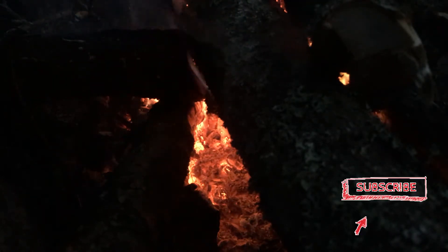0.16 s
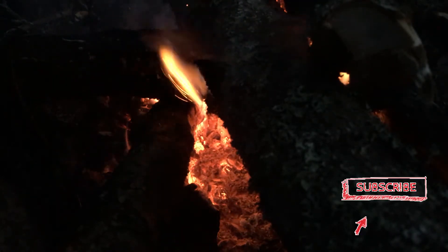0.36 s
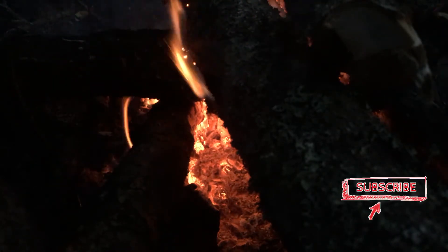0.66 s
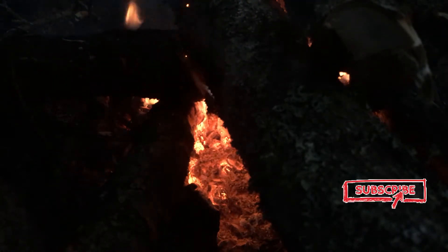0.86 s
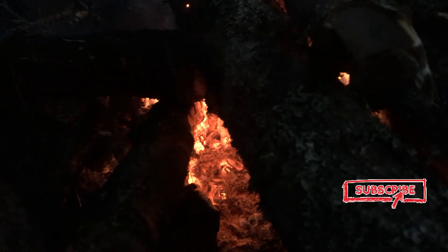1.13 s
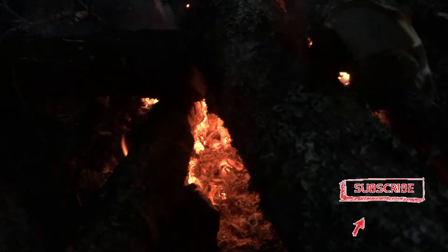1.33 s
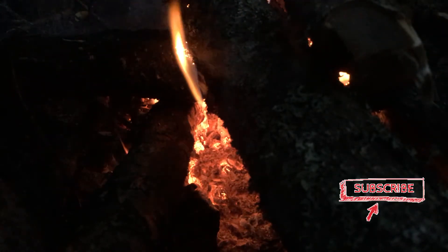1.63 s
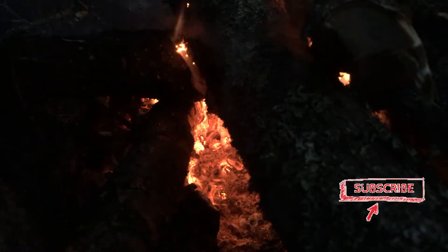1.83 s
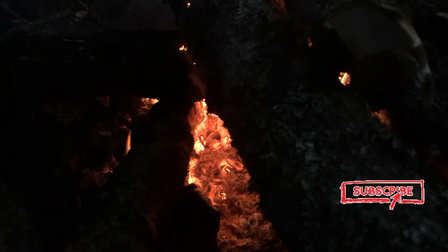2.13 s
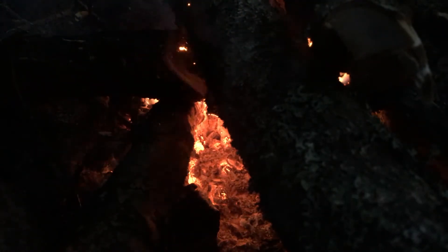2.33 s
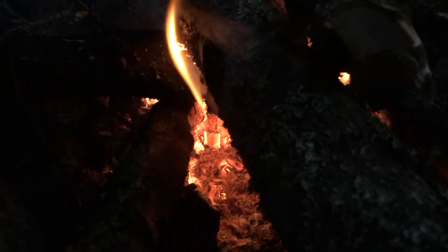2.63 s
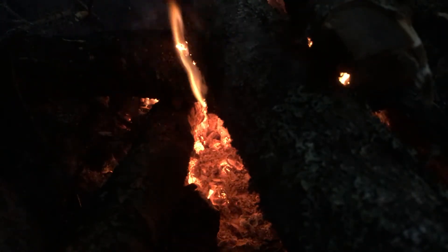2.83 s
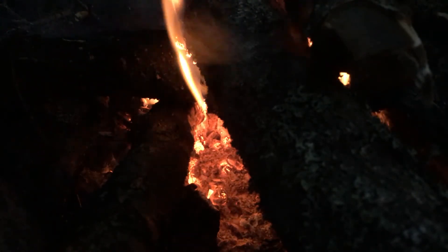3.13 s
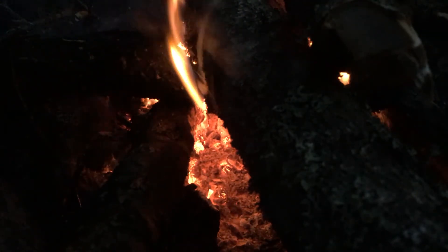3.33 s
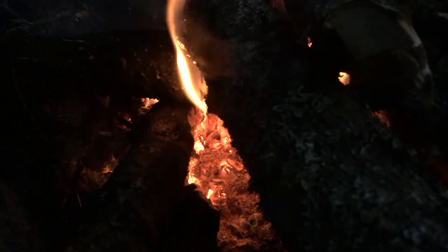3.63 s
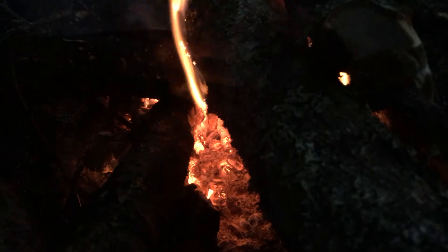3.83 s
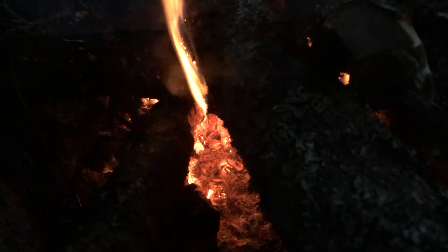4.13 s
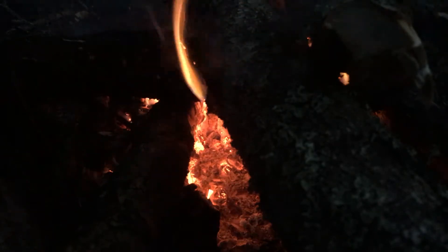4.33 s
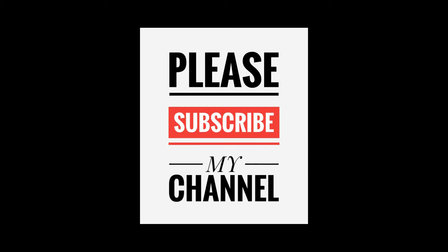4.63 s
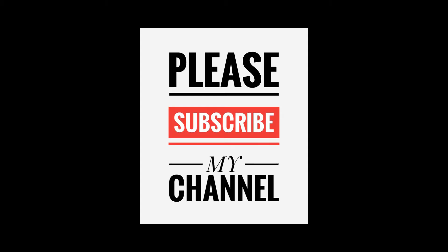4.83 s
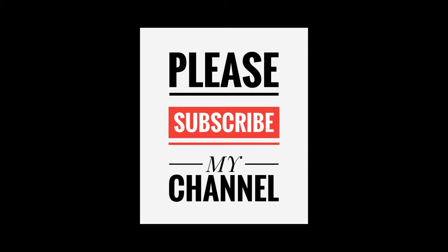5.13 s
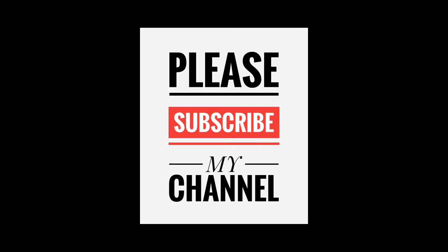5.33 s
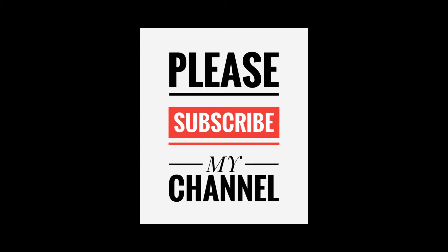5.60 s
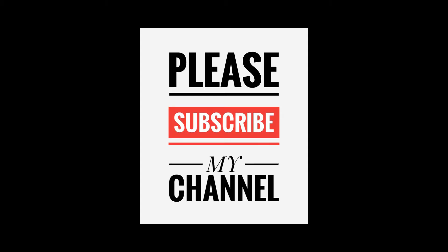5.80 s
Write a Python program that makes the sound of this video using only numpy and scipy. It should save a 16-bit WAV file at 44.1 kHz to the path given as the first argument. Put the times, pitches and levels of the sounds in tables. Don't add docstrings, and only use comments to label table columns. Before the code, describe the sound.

A summer night outdoors by a campfire, heard closely in stereo for about six seconds. A near katydid drones continuously, a bright, hissy buzz centred around 11 to 12 kHz, pulsing over 230 times a second, dipping most clearly near 2.3 s. Crickets around 7 kHz chirp roughly four times a second, mainly on the right, over soft distant trills near 4 kHz. Quiet, coarse four-scrape rasps come at 0.6, 2.0, 3.4 and 4.7 s, with a barely audible one at 1.45. Low flame roar flickers throughout, with soft flaps, strongest around 0.9 to 1 s. Dry ember snaps cluster in the first 0.6 s; duller pops follow at 2.3. At 3.36 to 3.5 s a log settles with hollow knocks, pops and crumbling grains. A faint crumble follows at 4.2, then scattered pops and a low knock from 5.3 to 5.8. Tiny ticks continue throughout.

```python
import sys
import numpy as np
from scipy import signal
from scipy.fft import rfft, irfft
from scipy.io import wavfile
from scipy.ndimage import uniform_filter1d, map_coordinates

SR = 44100
rng = np.random.default_rng(int(sys.argv[2]) if len(sys.argv) > 2 else 0)


def output_pcm(signal):
    pcm = np.clip(np.atleast_2d(signal).T, -1, 1) * 32767
    wavfile.write(sys.argv[1], SR, np.round(pcm).astype(np.int16))


def decibels_to_gain(level_db):
    exponent = np.asarray(level_db, float) / 20
    return 10 ** exponent


N = 262836
EARS = np.array([[.5], [-.5]])

# freq_hz, density_db (per Hz)
WING_COLOUR = [(4880, -62), (8300, -27), (10400, -4.5), (11500, -0.5), (12800, -2), (13300, -7.5),
               (14100, -20), (15600, -26)]
STROKES_PER_S, DRONE_DB, FALL_S = 232.3, -33, 0.047
# low_point_s, depth_db, recovery_s
DRONE_FALTERS = [(0.27, -2, 0.056), (0.44, -1, 0.17), (1.19, -2, .1), (1.44, -2, 0.093), (2.31, -5, 0.08),
                 (3.21, -2, 0.23), (3.42, -2, 0.08), (4.11, -2, 0.22), (4.45, -2.5, 0.25), (5.05, -2, 0.11),
                 (5.46, -2, 1), (5.63, -1.5, .4)]

# pitch_hz, chirps_per_s, first_chirp_middle_s
CRICKET_BEATS = [(7255, 3.518, .23), (7250, 4.132, .007), (7095, 4.126, -.02), (6930, 4.126, -.02),
                 (6820, 3.854, .188), (7370, 3.795, .01), (7260, 3.916, .239)]
# level_db, left_right_db
CRICKET_PLACES = [(-50.5, -9), (-51.5, -8.5), (-54, -10), (-57, -9), (-58, -12), (-60.5, -4), (-57, -14)]
REST_DB, PULSES_PER_S = -13, 43
STEADY_HZ, STEADY_DB, TRILL_DB = 7085, -52.5, -55

# freq_hz, density_db (per Hz)
ROAR_COLOUR = [(15, -4), (30, -5.5), (55, 0.5), (100, -6.5), (200, -11.5), (400, -21.5), (900, -30.5),
               (1600, -38.5), (3000, -35.5), (16000, -99)]
# start_s (middle of the swell), rise_db over the steady roar
FLAME_SURGES = [(0.33, 2.5), (0.9, 4), (1.1, 2), (1.54, 4), (2.22, 0.5), (2.53, 3), (2.8, 2), (3.23, 4),
                (3.9, 3.5), (4.3, 1.5), (5.37, 2.5), (5.55, 2.5)]
ROAR_DB, SURGE_S, ROAR_SAME = -44.5, 0.038, 0.67
# time_s, level_db
HISS_LEVEL = [(0.0, -62.5), (2.2, -62), (3.3, -64), (3.52, -61), (3.9, -62), (4.33, -62.5), (4.47, -65.5),
              (5.96, -65.5)]
# freq_hz, density_db (per Hz)
HISS_TONE = [(300, -2.5), (1000, 1.5), (1600, -1), (2100, 0.5), (3000, 2), (4800, -1), (6200, 1),
             (7700, -4), (8400, -39), (16000, 0)]

# start_s, peak_db, ring_hz, sizzle_db, left_right_db
EMBER_SNAPS = [(0.0288, -30.5, 3720, -8, 2), (0.2445, -36, 5880, 1, 3), (0.254, -29, 5550, -19, 10),
               (0.3487, -42, 4040, -20, 10), (0.3974, -28.5, 5900, -35, 4.5), (0.5082, -38, 4040, -4, 6),
               (0.5545, -40, 3930, 0, 0.0), (0.7462, -38, 6460, -13, -1.5), (1.4637, -38, 3850, -23, 6),
               (3.7227, -48, 3870, 4, 0.0), (3.8234, -39, 3980, -10, -0.5), (5.2647, -40, 3860, -8, 2),
               (5.6136, -39, 3910, -19, 8.5), (5.7703, -34, 3940, -20, 15)]
# start_s, peak_db, ring_hz, sizzle_db, left_right_db
DULL_POPS = [(0.0286, -26, 3430, -10, -1), (0.922, -37, 2340, -1, -5), (2.2871, -32, 1700, -28, 0.0),
             (2.387, -37.5, 1550, -20, 0.0), (3.3879, -33, 1860, -20, 1), (3.4576, -28.5, 1950, -25, -0.5),
             (3.4615, -34, 2480, -25, -0.5), (3.4941, -30, 2400, -20, -0.5), (3.904, -36, 1360, -13, -8),
             (5.3722, -35, 2100, -14, -10), (5.5087, -36, 2440, -22, 6), (5.7701, -30.5, 1520, -10, 7),
             (5.7746, -30, 3340, -16, -7.5)]
# start_s, peak_db, ring_hz
FAINT_POPS = [(1.654, -41, 3600), (2.293, -40.5, 1400), (2.5257, -49, 2590), (2.597, -40, 1700),
              (2.9543, -44, 2100), (3.0186, -44, 2430), (3.359, -40.5, 2330), (3.373, -44, 3490),
              (3.5118, -45, 3390), (4.2244, -51, 1860), (4.3094, -53, 3280), (4.4284, -42, 1750)]
FAINT_SIZZLE_DB, SNAP_THUMP_DB, POP_THUMP_DB = -10, -54, -49
# start_s,
# level_db, pitch_hz, t60_s
KNOCKS = [(0.2445, -27.5, 294, 0.014), (0.922, -42, 300, 0.027), (3.362, -45, 800, 0.037),
          (3.388, -30, 832, 0.037), (3.387, -44, 1260, 0.018), (3.456, -41, 1150, 0.023),
          (3.457, -35, 556, 0.041), (3.462, -39.5, 403, 0.037), (3.458, -36.5, 860, 0.054),
          (3.476, -36, 850, 0.037), (3.496, -38, 990, 0.022), (3.503, -43, 706, 0.028),
          (3.904, -45, 320, 0.019), (4.224, -37.5, 850, 0.02), (5.372, -33.5, 292, .025)]
# start_s, length_s, level_db, pitch_hz
CHAR_CRUMBLES = [
    (0.019, 0.031, -57, 1490),
    (2.499, 0.15, -64, 1500),
    (3.001, 0.13, -61.5, 750),
    (3.355, 0.065, -57, 1500),
    (3.453, 0.073, -57, 1510),
    (4.199, .27, -64.5, 1300),
]
# start_s, peak_db, pitch_hz
FLAME_FLAPS = [(0.123, -30.5, 182), (0.317, -30.5, 98), (0.888, -23.5, 142), (0.984, -25, 96.9),
               (1.116, -30, 141), (1.397, -37, 153), (2.263, -30.5, 129), (2.524, -32, 147),
               (3.227, -27, 114), (3.763, -33, 258), (4.051, -35.5, 98), (4.83, -35, 92), (5.374, -29, 154),
               (5.681, -49, 106)]

# start_s, level_db, scrape_gap_s
RASP_PHRASES = [
    (0.619, -52.5, 0.069),
    (1.45, -69, 0.0565),
    (2.01, -53, 0.068),
    (3.37, -53, 0.0706),
    (4.717, -53.5, 0.073),
]
# freq_hz, width_hz, level_db
RASPER_BODY = [(2100, 380, -3.5), (3360, 630, 0.5), (4570, 680, 2), (5050, 570, -5)]
TEETH_PER_S, FAR_RASP_DB = 140, -73.5
# start_s, length_s, level_db, pitch_hz
SMALL_BUZZES = [
    (0.915, 0.11, -57.5, 6070),
    (3.705, 0.13, -67, 6030),
    (4.93, 0.118, -61, 5970),
]

# freq_hz, margin_db
THINNED_BANDS = [(2000, -10), (3000, -7), (3600, -7), (3700, -20), (4250, -20), (4350, -4), (6200, -4),
                 (6500, -20), (7550, -20), (7650, -.5), (8300, -.5), (8900, -10), (14500, -6), (15300, .2)]


def evened(x):
    return x / np.sqrt(np.mean(x ** 2) + 1e-20)


def curve(rows):
    s, *columns = np.transpose(rows)
    return [np.interp(np.arange(N) / SR, s, c) for c in columns]


def read(points, hz):
    f, value = np.transpose(points)
    return np.interp(np.log(hz + 1), np.log(f + 1), value)


def add(mix, s, sound):
    part = mix[..., round(s * SR):][..., :sound.shape[-1]]
    part += sound[..., :part.shape[-1]]


def resonate(x, hz, width):
    r = np.exp(-np.pi * width / SR)
    pole = r * np.exp(2j * np.pi * hz / SR)
    return 2 * signal.lfilter([1 - r], [1, -pole], x + 0j).real


def drift(rate):
    knots = rng.standard_normal(2000)
    return evened(map_coordinates(knots, [np.arange(N) / SR * rate + 5], order=3))


def placed(x, pan_db, wet_db, t60):
    t = np.arange(SR // 2) / SR
    tail = rng.standard_normal((2, len(t))) * decibels_to_gain(-60 * t / t60) * np.minimum(t / 0.0038, 1)
    wet = signal.fftconvolve(x[None], tail / np.linalg.norm(tail[0]), axes=1)[:, :N]
    return (x + decibels_to_gain(wet_db) * wet) * decibels_to_gain(EARS * pan_db)


def effort():
    s, depth_db, back_s = np.transpose(DRONE_FALTERS)[:, :, None]
    since = np.arange(N) / SR - s
    falling = np.exp(-(since / FALL_S) ** 2)
    recovering = np.exp(-abs(since) / back_s)
    return DRONE_DB + (depth_db * np.where(since < 0, falling, recovering)).sum(axis=0)


def drone():
    rate = STROKES_PER_S * (1 + .007 * drift(4))
    cycle = np.cumsum(rate / 2 * (1 + .015 * drift(100))) / SR
    hz = np.fft.rfftfreq(N, 1 / SR)
    low = (14000 - hz) / 5000
    strokes = [(.25, 0, -1.2, .0017), (.75, -6.5, 1.2, .0015)]
    wings = 0
    for at, db, tilt_db, fall_s in strokes:
        click = np.diff(np.floor(cycle - at + .012 * drift(300)), prepend=-1) * decibels_to_gain(1.6 * drift(120))
        scrape = np.exp(-.5 * ((cycle % 1 - at) / 0.13) ** 2) * rng.standard_normal(N)
        stroke = evened(click) + 0.66 * evened(scrape)
        tilt = decibels_to_gain(db + tilt_db * (hz - 11500) / 1000)
        falling_pitch = np.exp(-1j * np.pi * 5000 * fall_s * -low ** 2)
        wings = wings + rfft(stroke) * tilt * falling_pitch
    colour = decibels_to_gain(read(WING_COLOUR, hz))
    flat = wings / np.sqrt(uniform_filter1d(abs(wings) ** 2, size=3000))
    near = evened(irfft(flat * colour, N))
    blur = rng.standard_normal((3, N))
    others = evened(irfft(rfft(blur[:2] + 0.93 * blur[2]) * colour, N))
    both = placed(near, -.1, -0.53, 0.28) + others
    lean_db = EARS * 1.24 * (11500 - hz) / 1000
    return evened(irfft(rfft(both) * decibels_to_gain(lean_db), N)) * decibels_to_gain(effort())


def singer(hz, rate, duty, glide):
    cycle = np.cumsum(rate * (1 + .04 * drift(6))) / SR + rng.random()
    part = np.minimum(cycle % 1 / duty, 1)
    pitch = hz * (1 + glide * (.5 - part) + .003 * drift(30))
    pulse = np.sin(np.pi * part) ** 0.78 * decibels_to_gain(1.2 * drift(40))
    return evened(pulse * np.sin(2 * np.pi * np.cumsum(pitch) / SR))


def crickets():
    t, near = np.arange(N) / SR, 0
    for k, ((hz, beat, first_s), (db, pan_db)) in enumerate(zip(CRICKET_BEATS, CRICKET_PLACES)):
        swell_db = REST_DB * np.sin(np.pi * beat * (t - first_s)) ** 2
        song = singer(hz, PULSES_PER_S + 3 * k, .7, .02) * decibels_to_gain(db + swell_db)
        near = near + placed(song, pan_db, -1.2, 0.27)
    steady = placed(singer(STEADY_HZ, 66, 0.9, .03), -7.5, -2.2, 0.096) * decibels_to_gain(STEADY_DB)
    pitch, rate = rng.random((12, 2)).T
    spread = (np.arange(len(pitch)) + pitch) / len(pitch)
    far = 0
    for p, r in zip(spread, rate):
        far = far + singer(7390 - 900 * p, 35 + 35 * r, 0.66, .04) * decibels_to_gain(-14 * p ** 2 + 2.1 * drift(5.6))
    return near + steady + placed(evened(far), -1.5, 1.9, 0.45) * decibels_to_gain(-54.5)


def tree_crickets():
    far = 0
    for p, r in zip(np.linspace(0, 1, 8), rng.random(8)):
        far = far + singer(3760 + 330 * p, 44 + 16 * r, .6, 0.054) * np.sin(.5 + 2.29 * p)
    trills = singer(3950, 51.5, .6, 0.056) + 3.1 * evened(far)
    return evened(placed(trills, 0.84, -2.5, 0.29)) * decibels_to_gain(TRILL_DB + .6 * drift(5.01))


def surge():
    s, db = np.transpose(FLAME_SURGES)[:, :, None]
    swell = np.exp(-((np.arange(N) / SR - s) / SURGE_S) ** 2)
    return ROAR_DB + (db * swell).sum(axis=0)


def shaped(colour, frame, patchy_db, same):
    frames = N // (frame // 4) + 5
    a, b, c, d, patches = rng.standard_normal((frames, frame // 2 + 1, 5)).T
    smooth = uniform_filter1d(patches, size=14, axis=0)
    patches = evened(uniform_filter1d(smooth, size=8, axis=1))
    left = a + 1j * b
    right = same * left + np.sqrt(1 - same ** 2) * (c + 1j * d)
    z = np.array([left, right]) * decibels_to_gain(patchy_db * patches)
    white = signal.istft(z, nperseg=frame, noverlap=frame * 3 // 4)[1][:, :N]
    gain = decibels_to_gain(read(colour, np.fft.rfftfreq(N, 1 / SR)))
    return evened(irfft(rfft(white) * gain, N))


def air():
    roar = decibels_to_gain(surge()) * shaped(ROAR_COLOUR, frame=1024, patchy_db=1.0, same=ROAR_SAME)
    hiss = decibels_to_gain(curve(HISS_LEVEL)[0] + 9.0) * shaped(HISS_TONE, frame=512, patchy_db=1.0, same=0.71)
    return (roar + hiss) * decibels_to_gain(-EARS / 2)


def snap(hz, thump_db, sizzle_db, sizzle_hz, t):
    grains = rng.standard_normal(len(t)) * (rng.random(len(t)) < .3)
    crack = grains * decibels_to_gain(-60 * t / 0.011) + 2.38 * (t == 0)
    ring = resonate(crack, hz, 1200)
    sizzle = resonate(crack, sizzle_hz, 4200)
    thump = np.sin(2 * np.pi * 300 * t) * decibels_to_gain(-60 * t / .02)
    bright = decibels_to_gain(sizzle_db + 16.5) * sizzle / abs(sizzle).max()
    return ring / abs(ring).max() + bright + decibels_to_gain(thump_db) * thump


def embers():
    t, out = np.arange(3000) / SR, np.zeros((2, N))
    faint = [(s, db, hz, FAINT_SIZZLE_DB, 0) for s, db, hz in FAINT_POPS]
    kinds = [(EMBER_SNAPS, 9000, SNAP_THUMP_DB), ([*DULL_POPS, *faint], 6500, POP_THUMP_DB)]
    for rows, sizzle_hz, thump_db in kinds:
        for s, db, hz, sizzle_db, pan_db in rows:
            burst = snap(hz, thump_db - db, sizzle_db, sizzle_hz, t)
            add(out, s, decibels_to_gain(db + EARS * pan_db) * burst)
    for s, db, hz, t60 in KNOCKS:
        onset = 1 - np.exp(-t / 0.003)
        add(out, s, decibels_to_gain(db + 3.5 - 60 * t / t60) * np.sin(2 * np.pi * hz * t) * onset)
    tick_size = decibels_to_gain(5.1 * np.minimum(rng.exponential(1, N), 3))
    ticks = (rng.random(N) < 40 / SR) * tick_size * rng.choice([-1, 1], N)
    out += decibels_to_gain(-49) * resonate(ticks, 1970, 3840)
    for s, length, db, hz in CHAR_CRUMBLES:
        n = round(length * SR)
        grains = rng.standard_normal((n, 2)).T * (rng.random(n) < 700 / SR)
        add(out, s, decibels_to_gain(db) * evened(resonate(grains + grains.sum(axis=0), hz, 0.61 * hz)))
    out += placed(out.mean(0), 0, 1.0, 0.066) * decibels_to_gain(-10.5)
    for s, db, hz in FLAME_FLAPS:
        puff = np.sin(np.pi * np.minimum(t / 0.028, 1)) ** 2
        add(out, s, decibels_to_gain(db - 9) * np.sin(2 * np.pi * hz * t) * puff)
    return out


def rasper():
    t, gate = np.arange(N) / SR, np.zeros(N)
    for s, db, step in RASP_PHRASES:
        for k in range(4):
            scrape = np.sin(np.pi * np.clip((t - s - k * step) / 0.064, 0, 1)) ** 0.38
            gate += decibels_to_gain(db - 0.99 * abs(k - 1.5)) * scrape
    teeth = rng.standard_normal(N) * decibels_to_gain(0.39 * drift(300))

    def rung(hz, width):
        return evened(resonate(resonate(teeth, hz, width), hz, width))

    body = evened(sum(decibels_to_gain(db) * rung(hz, width) for hz, width, db in RASPER_BODY))
    strikes = np.cos(2 * np.pi * np.cumsum(TEETH_PER_S * (1 + .1 * drift(30))) / SR)
    out = body * gate * (1 + 0.36 * strikes)
    out += decibels_to_gain(FAR_RASP_DB + 2 * drift(8)) * rung(2055, 170)
    for s, length, db, hz in SMALL_BUZZES:
        swell = np.sin(np.pi * np.clip((t - s) / length, 0, 1)) ** .5
        out += decibels_to_gain(db) * rung(hz, 300) * swell
    return placed(out, -4.5, -2.0, 0.63)


def scene():
    return drone() + crickets() + tree_crickets() + air() + embers() + rasper()


def starved(x):
    frame = dict(window="cosine", nperseg=2048, noverlap=1024)
    lead = 714
    hz, _, z = signal.stft(np.pad(x, ((0, 0), (lead, 0))), SR, **frame)
    band = np.arange(len(hz)) // 8
    band_hz = hz[::8]
    power = np.add.reduceat((abs(z) ** 2).sum(axis=0), np.arange(0, len(hz), 8))
    wide = uniform_filter1d(power, size=3, axis=0)
    power_db = 10 * np.log10(np.where(band_hz[:, None] > 7000, wide, power) + 1e-20)
    margin_db = read(THINNED_BANDS, band_hz + 85)
    kept = power_db > (np.median(power_db, axis=1) + margin_db)[:, None]
    return signal.istft(z * kept[band], SR, **frame)[1][:, lead:lead + N]


def low_pass(x):
    return signal.sosfilt(signal.butter(12, 15720, fs=SR, output="sos"), x)


def record(dry):
    mix = starved(dry)
    return low_pass(mix)


dry = scene()
out = record(dry)
output_pcm(out)
```